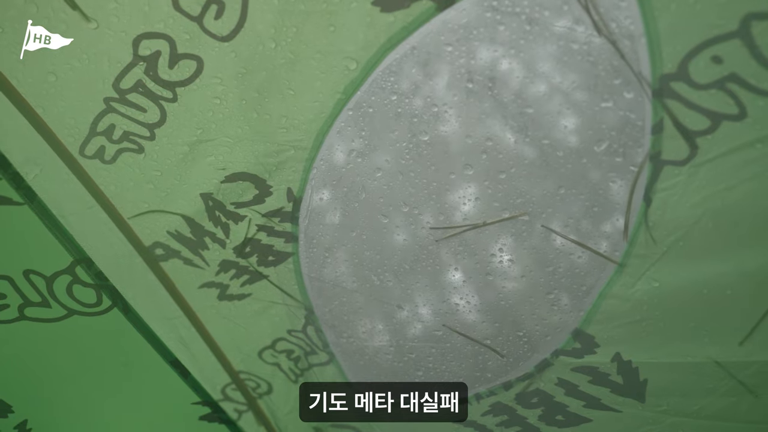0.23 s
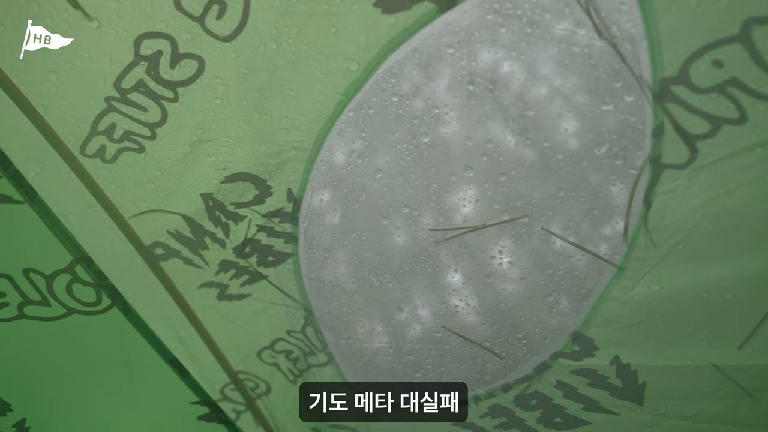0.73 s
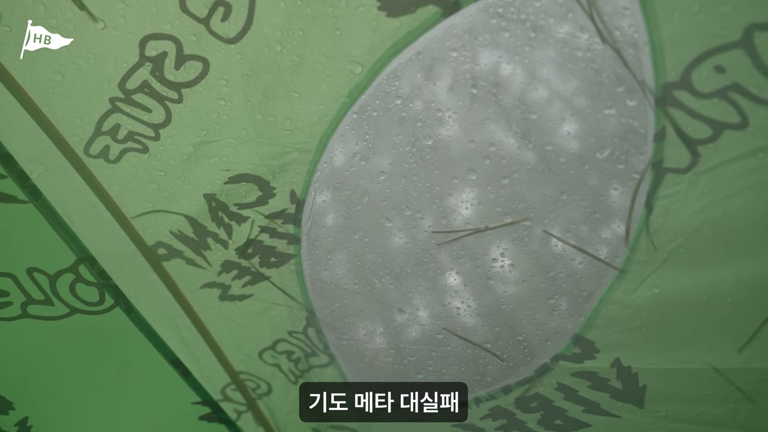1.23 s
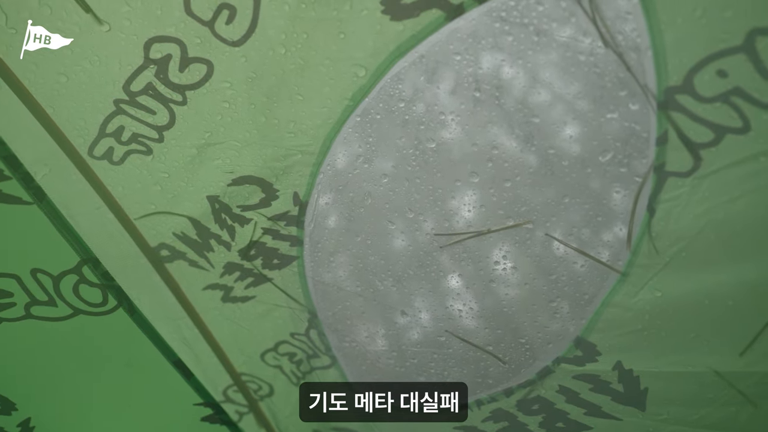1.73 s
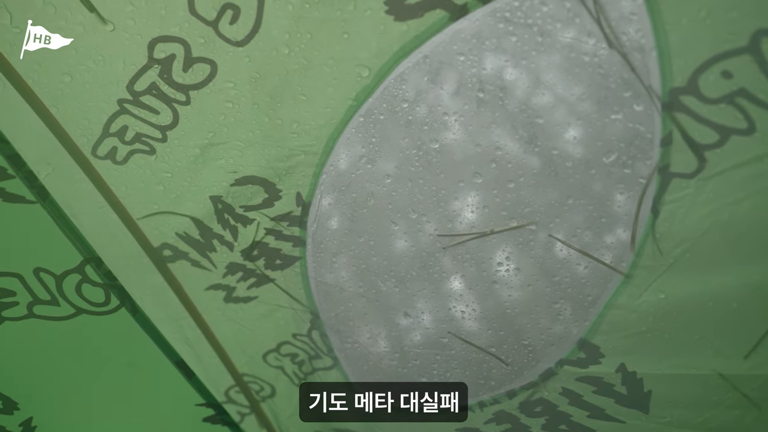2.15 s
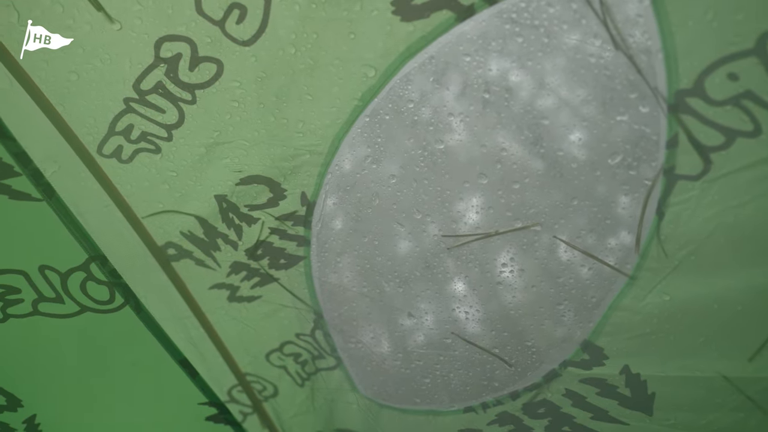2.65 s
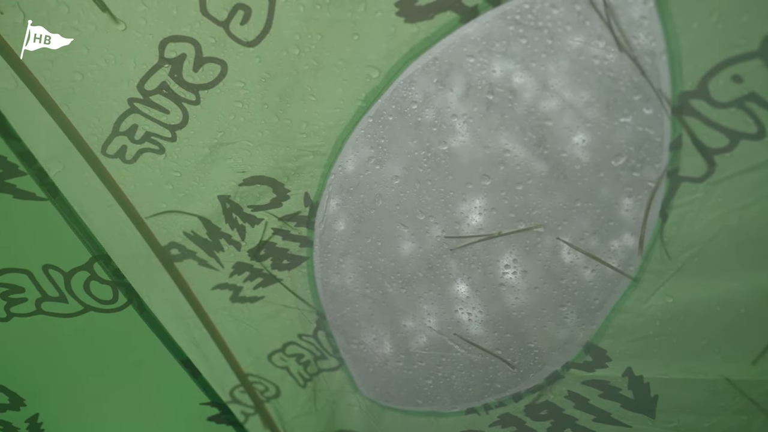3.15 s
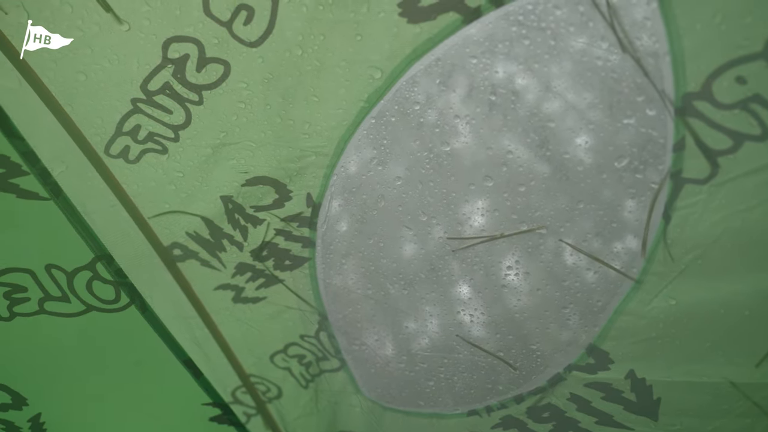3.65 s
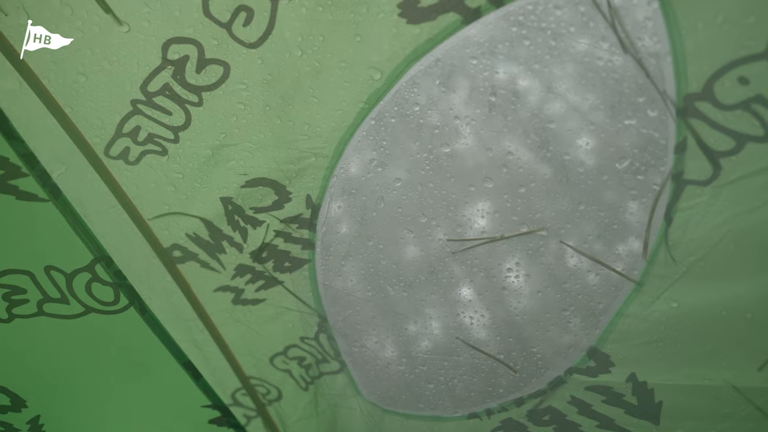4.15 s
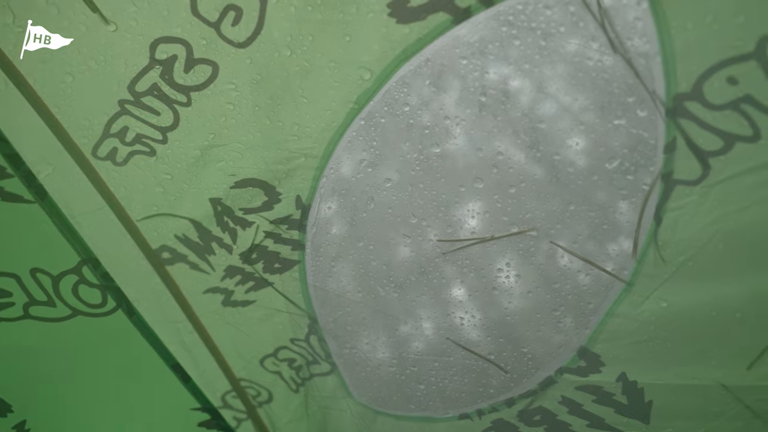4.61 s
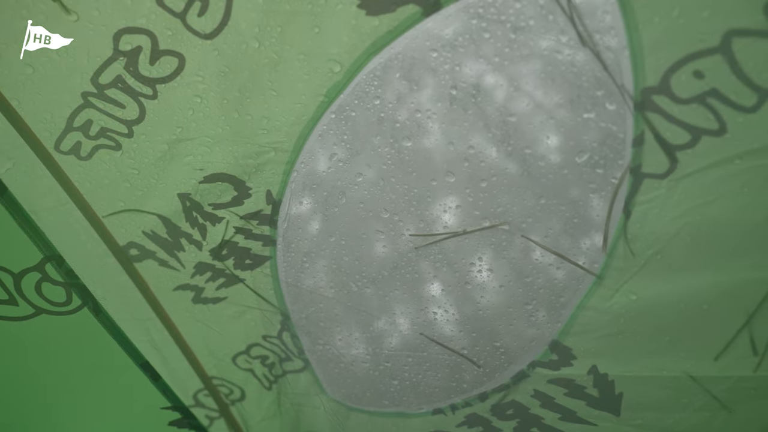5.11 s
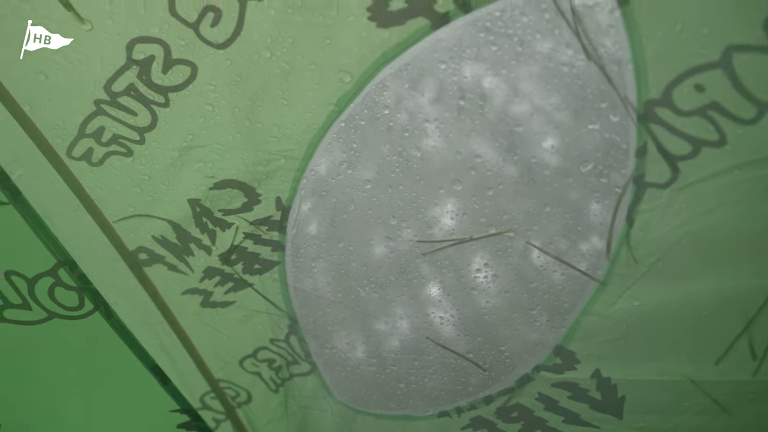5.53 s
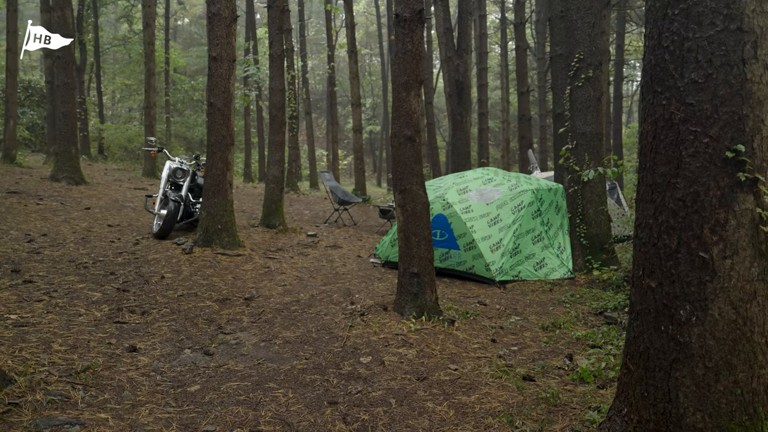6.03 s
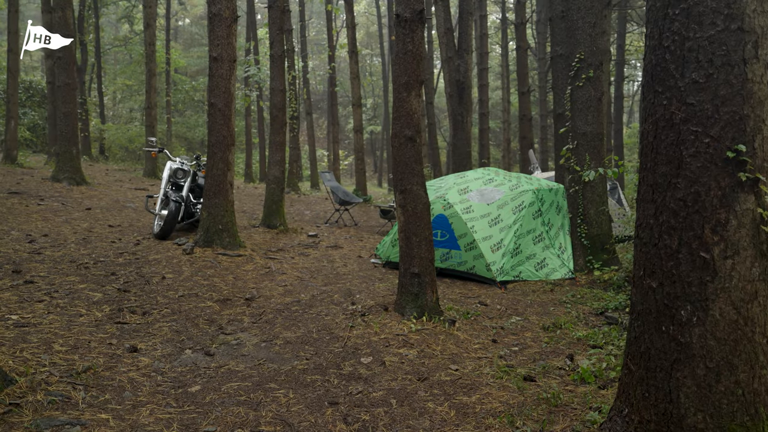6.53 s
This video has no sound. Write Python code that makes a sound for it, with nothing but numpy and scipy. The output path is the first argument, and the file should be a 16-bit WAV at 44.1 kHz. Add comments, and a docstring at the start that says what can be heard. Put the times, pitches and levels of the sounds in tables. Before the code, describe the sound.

Under tent fabric, uneven drops tap and pop over fine rain patter and faint birdsong, before a sudden cut to hushed forest drizzle.

```python
"""Fine rain hisses and patters; at once drops from trees thud, tick and splash on a taut tent, heard from inside.
Each drop sets off cloth modes, a panel sway and noise bursts; filtered noise hisses and resonators patter.
Far off two small birds whistle as gliding sines, scattered among the trunks, over a faint noise-band twitter.
Near the end the listener stands outside: the birds cease, the hiss takes another colour,
and the patter goes on with a few soft drips and bright leaf ticks."""
import sys
import numpy as np
from scipy import signal
from scipy.fft import rfft, irfft
from scipy.io import wavfile

SR = 44100
rng = np.random.default_rng(int(sys.argv[2]) if len(sys.argv) > 2 else 0)


def persist_wave(psi):
    """Save psi, clipped to +-1, as 16-bit WAV."""
    counts = np.round(np.clip(psi, -1, 1) * 32767).astype(np.int16)
    wavfile.write(sys.argv[1], SR, np.atleast_2d(counts).T)


N = 298557
STEP_OUT_S = 5.77   # inside the tent before, among the trees after


def from_db(db):
    """Logarithmic level: the amplitude gain of a level in dB."""
    return 10 ** (np.asarray(db) / 20)


def rms_one(x):
    """Power normalisation: scale to rms 1."""
    return x / np.sqrt(np.mean(x ** 2) + 1e-20)


def peak_one(rows):
    """Peak normalisation: scale each row to peak 1."""
    return rows / np.abs(rows).max(axis=1, keepdims=True)


def dying(t, t60):
    """Exponential damping: an envelope that loses 60 dB in t60 seconds."""
    return from_db(-60 * t / t60)


def coloured(x, spectrum):
    """Spectral shaping: weight noise by a (Hz, dB) table along the last axis; rms 1."""
    size = x.shape[-1]
    hz, level_db = np.transpose(spectrum)
    bins = np.maximum(np.arange(size // 2 + 1) * SR / size, 1)
    gain = from_db(np.interp(np.log(bins), np.log(hz), level_db))
    return rms_one(irfft(rfft(x) * gain, size))


def band(x, low_hz, high_hz):
    """Band limiting: causal band-pass along the last axis."""
    return signal.sosfilt(signal.butter(2, [low_hz, high_hz], "band", fs=SR, output="sos"), x)


def low_pass(x, hz):
    """High-frequency loss: causal second-order low-pass along the last axis."""
    return signal.sosfilt(signal.butter(2, hz, fs=SR, output="sos"), x)


def slow(shape, rate_hz):
    """Random modulation: noise that wanders at about the given rate along the last axis; rms 1."""
    return rms_one(low_pass(rng.standard_normal(shape), rate_hz))


def convolved_rows(a, b):
    """Linear response: circular convolution of rows, which die out within their length."""
    return irfft(rfft(a) * rfft(b), a.shape[-1])


# Colour of the far rain under the cloth and in the open, before scaling to rms 1: f/Hz, level/dB [dB per Hz]
HISS_INSIDE = [(15, -46), (25, 0.5), (273, 3.5), (433, 4), (809, 0), (927, 0.5), (1320, -0.5), (1550, -3),
               (2750, -3.5), (3700, -1), (5130, -13), (14400, -26), (16500, -40)]
HISS_OUTSIDE = [(12, -29), (20, 2), (49, -5), (117, 5), (224, 0), (492, -3), (634, -3.5), (888, -1),
                (2310, -8.5), (3620, -2.5), (5520, -16), (15200, -30.5), (16500, -46)]
HISS_DB = -58


def hiss():
    """Superposition of countless impacts: far rain as smooth noise, whose colour depends on the place."""
    inside = coloured(rng.standard_normal(N), HISS_INSIDE)
    outside = coloured(rng.standard_normal(N), HISS_OUTSIDE)
    return from_db(HISS_DB) * np.where(np.arange(N) / SR < STEP_OUT_S, inside, outside)


# The patter swells and eases: t/s, level/dB [rms]
RAIN = [(0.0, -64), (0.41, -58.5), (1.71, -64), (2.3, -62), (2.6, -58.5), (3.18, -64), (3.75, -59.5),
        (4.26, -63), (4.7, -58), (5.19, -55), (5.88, -65), (6.77, -61)]
PATTER_PER_S, PATTER_SPREAD_DB = 300, 2.5


def patter():
    """Random impulses exciting damped resonators: each small drop rings one or two pitches for a few cycles."""
    extra_db = PATTER_SPREAD_DB * np.minimum(rng.exponential(1, N), 3)
    sizes = from_db(extra_db) * (rng.random(N) < PATTER_PER_S / SR)
    pitches = np.geomspace(600, 9000, 10)
    dealt = rng.integers(0, 10, (2, N))
    ringing = np.zeros(N)
    for k, hz in enumerate(pitches):
        radius = from_db(-60 * hz / (6.0 * SR))   # loses 60 dB in six cycles
        angle = 2 * np.pi * hz / SR
        strike = from_db(-5.0 * abs(np.log2(hz / 3000))) * sizes * (dealt == k).any(axis=0)
        resonator = [0, np.sin(angle)], [1, -2 * radius * np.cos(angle), radius ** 2]
        ringing += signal.lfilter(*resonator, strike + 1e-18)
    t = np.arange(SR // 40) / SR
    smear = (t == 0) + 0.39 * rng.standard_normal(len(t)) * dying(t, 0.027)   # each leaves a little splash
    soft = low_pass(signal.fftconvolve(ringing, smear)[:N], 5500)
    s, level_db = np.transpose(RAIN)
    return from_db(np.interp(np.arange(N) / SR, s, level_db)) * rms_one(soft)


def far_twitter():
    """Amplitude-modulated narrow-band noise: a faint twitter that comes and goes until the listener is outside."""
    twitter = rms_one(band(rng.standard_normal(N), 7400, 7630))
    level_db = -80.5 + 3.3 * slow(N, 6.1)
    return twitter * from_db(level_db) * (np.arange(N) / SR < STEP_OUT_S)


THUD_CYCLES = 6.16   # cycles to lose 60 dB
OVERTONE_T60_S, TICK_T60_S = 0.004, 0.0027
TICK_HZ, TICK_SPREAD = 3515, 0.084       # central pitch, greatest share by which the spot shifts it
BREAK_UP_DB, BREAK_UP_T60_S = -8, 0.0085
CONTACT_HZ = 5950   # water is soft: it cannot excite the cloth much above this


def cloth_modes(t, spot, thud_hz, over_hz, over_db, tick_db):
    """Modal excitation of a membrane: a damped low mode, with a high mode and tick driven by a ragged push."""
    # the drop shatters: a ragged push after the first
    push = (t == 0) + from_db(BREAK_UP_DB) * rng.standard_normal((len(spot), len(t))) * dying(t, BREAK_UP_T60_S)
    thud = np.sin(2 * np.pi * thud_hz * t) * dying(t, THUD_CYCLES / thud_hz)
    overtone = np.sin(2 * np.pi * over_hz * t) * dying(t, OVERTONE_T60_S)
    tick_hz = TICK_HZ * (1 + TICK_SPREAD * np.tanh(spot))
    tick = np.sin(2 * np.pi * tick_hz * t) * dying(t, TICK_T60_S)
    overtone, tick = convolved_rows(overtone, push), convolved_rows(tick, push)
    thud, overtone, tick = [peak_one(low_pass(mode, CONTACT_HZ)) for mode in (thud, overtone, tick)]
    return thud + from_db(over_db) * overtone + from_db(tick_db) * tick


def crack(t, noise):
    """Transient broadband radiation: a very short band of noise at impact; peak 1."""
    return peak_one(band(noise * dying(t, 0.0019), 2900, 9100))


# Drops on a slack panel, which sways more: t/s, extra sway level/dB
SLACK_HITS = [(.3348, 10), (.5818, 15.5), (1.9484, 11), (2.4411, 8), (2.4843, 4), (2.7523, 6.5),
              (3.3563, 15), (3.3904, 18), (3.7375, 7), (4.7214, 12), (4.9, 9), (5.1511, 12.5),
              (5.3842, 12.5), (5.5412, 12), (5.5981, 15), (5.675, 10)]
# against the thud of a middling drop: more sway under a deep thud, less in step with a strong one
MIDDLING_DB, MIDDLING_HZ = -35, 800
SWAY_DB, SWAY_DB_PER_OCTAVE, SWAY_SHRINKS = -29.5, -2, 0.32
# glide at a central spot; SPOT_SHIFT is the spread of pitch from spot to spot, as a share
SWAY_START_HZ, SWAY_END_HZ, SWAY_GLIDE_S, SPOT_SHIFT = 272, 82, 0.0173, 0.22
SWAY_T60_S = 0.25


def panel_sway(t, spot, s, thud_db, thud_hz):
    """Tension-dependent resonance: the stretched panel slackens, so its low tone falls, with low noise."""
    level_db = SWAY_DB + SWAY_DB_PER_OCTAVE * np.log2(thud_hz / MIDDLING_HZ)
    level_db = level_db - SWAY_SHRINKS * (thud_db - MIDDLING_DB)
    level_db = level_db + sum(extra_db * (abs(s - at) < .005) for at, extra_db in SLACK_HITS)
    hz = SWAY_END_HZ + (SWAY_START_HZ - SWAY_END_HZ) * np.exp(-t / SWAY_GLIDE_S)
    tone = np.sin(2 * np.pi * np.cumsum(hz) / SR * (1 + SPOT_SHIFT * spot))
    rumble = peak_one(band(rng.standard_normal(tone.shape), 50, 196))
    sway = (tone + 1.9 * rumble) * (1 - dying(t, 0.035)) * dying(t, SWAY_T60_S)
    return from_db(level_db) * peak_one(sway)


def droplets(t, rows):
    """Random granularity: the sheet takes a moment to tear up, and falls in separate droplets."""
    return from_db(3.33 * slow((rows, len(t)), 267)) * (1 - dying(t, 0.0029))


# Colour of the splash, before scaling to rms 1: f/Hz, level/dB [dB per Hz]
SPLASH = [(150, -20), (500, 3.5), (1500, -3.5), (2600, -2.5), (3700, 0.5), (5200, -8.5), (7000, -42)]
SPLASH_S, SPLASH_SHAPE = 0.011, 1.19   # it holds, then drops away
OWN_COLOUR = 0.63   # share of its power that rings the struck spot


def splash(t, cloth, noise):
    """Random re-excitation: falling droplets ring the same modes as the drop, mixed with plain splash noise."""
    rung = convolved_rows(cloth, rng.standard_normal(cloth.shape))
    rung = rung / rung.std(axis=1, keepdims=True)
    mixed = np.sqrt(OWN_COLOUR) * rung + np.sqrt(1 - OWN_COLOUR) * coloured(noise, SPLASH)
    return mixed * droplets(t, len(cloth)) * np.exp(-(t / SPLASH_S) ** SPLASH_SHAPE)


# Colour of the spray, before scaling to rms 1: f/Hz, level/dB [dB per Hz]
SPRAY = [(3500, -26), (5500, 1.5), (8000, -4), (11000, -13), (15500, -17)]
SPRAY_BELOW_SPLASH_DB, SPRAY_FOLLOWS_CRACK, SPRAY_T60_S = -11.5, 0.24, 0.084


def spray(t, crack_db, splash_db):
    """Decaying granular noise: bright spray, longer than the splash and stronger after a strong crack."""
    level_db = splash_db + SPRAY_BELOW_SPLASH_DB + SPRAY_FOLLOWS_CRACK * crack_db
    noise = coloured(rng.standard_normal((len(crack_db), len(t))), SPRAY)
    return from_db(level_db) * noise * droplets(t, len(crack_db)) * dying(t, SPRAY_T60_S)


def taps(table):
    """Impact superposition: each row's drop rings the cloth, cracks, sways the panel, splashes and sprays."""
    s, thud_db, thud_hz, over_hz, over_db, tick_db, crack_db, splash_db = np.transpose(table)[:, :, None]
    t = np.arange(3600) / SR
    spot = rng.standard_normal((len(s), 1))   # where the drop lands shifts tick and sway
    noise = rng.standard_normal((len(s), len(t)))   # crack and splash come from the same water
    cloth = cloth_modes(t, spot, thud_hz, over_hz, over_db, tick_db)
    sounds = cloth + from_db(crack_db) * crack(t, noise)
    sounds = sounds + panel_sway(t, spot, s, thud_db, thud_hz)
    sounds = sounds + from_db(splash_db) * splash(t, cloth, noise) + spray(t, crack_db, splash_db)
    sounds = from_db(thud_db) * sounds
    out = np.zeros(N + len(t))
    for start, sound in zip((s[:, 0] * SR).astype(int), sounds):
        out[start:start + len(t)] += sound
    return out[:N]


# Mean and spread of the small drops' levels, rows thud, overtone, tick, crack, splash (the last four
# against the thud): mean level/dB, spread of level/dB; the patter's swing is added to the thud
SMALL_DB = [(-50.5, 4.34), (3.5, 3.7), (0.5, 8.8), (-13, 11), (-10, 5.5)]
SMALL_DROPS = 70
SMALL_THUD_HZ, SMALL_OVERTONE_HZ = (360, 1300), (1400, 2900)   # ranges
SMALL_FOLLOW = 0.34   # share of the patter's swing


def small_drops():
    """Random arrivals: small drops at chance moments under the cloth, louder when the patter swells."""
    when, low, high = rng.random((SMALL_DROPS, 3)).T
    mean, spread = np.transpose(SMALL_DB)
    luck = np.clip(rng.standard_normal((SMALL_DROPS, 5)), -2, 2)
    thud_db, *parts_db = (mean + spread * luck).T
    s = when * STEP_OUT_S
    rain_s, patter_db = np.transpose(RAIN)
    thud_db = thud_db + SMALL_FOLLOW * (np.interp(s, rain_s, patter_db) - patter_db.mean())
    thud_hz = SMALL_THUD_HZ[0] * (SMALL_THUD_HZ[1] / SMALL_THUD_HZ[0]) ** low
    over_hz = SMALL_OVERTONE_HZ[0] * (SMALL_OVERTONE_HZ[1] / SMALL_OVERTONE_HZ[0]) ** high
    return taps(np.transpose([s, thud_db, thud_hz, over_hz, *parts_db]))


# The drops one can point at, on the cloth and later among the trees: t/s, thud peak level/dB, thud f/Hz,
# overtone f/Hz, then level/dB against the thud of overtone, tick, crack, splash
DROPS = [(0.0357, -46.5, 1300, 1620, 13.5, -10, -15, -11), (0.045, -47, 940, 2000, 8, 8.5, 2, -1),
         (0.0592, -51.5, 654, 1490, -3, 4, -6, 3), (0.0965, -25, 1340, 1420, 0.5, -25, -29, -10),
         (0.128, -38.5, 930, 1400, -8, -18, -22, -27), (0.1757, -47, 930, 2900, -11, 17, -31, 7),
         (0.1942, -32.5, 1290, 1440, 8.5, 1, -14, -21), (0.2787, -6.5, 770, 1160, 3, -6.5, -21, -31),
         (0.3356, -35.5, 730, 1420, -14, -22, -28, -6.5), (0.394, -50, 700, 2830, 2, 10, 0, -10),
         (0.404, -33.5, 403, 1700, -15, 13.5, -6, -9), (0.4186, -34, 610, 2660, 1, 6, -10, -7.5),
         (0.4316, -31, 394, 1940, -1, -6, -15, -13.5), (0.4757, -43, 1300, 1650, 17, 7, -24, -1),
         (0.4962, -35.5, 970, 1750, -1, 4, -23, -13), (.539, -30, 1060, 1520, -1, -6, -13, -21),
         (0.5568, -46, 1140, 2820, 7, -6, -9, 0), (0.5819, -9, 623, 1440, 3.5, -5.5, -21, -21),
         (0.6304, -35, 555, 1550, 4.5, -13, -16, -12.5), (0.7494, -28, 815, 1340, -2, -4, -17, -27),
         (0.7633, -41, 1290, 1520, 11.5, -17, -12, -4.5), (0.8021, -38.5, 736, 1540, 4, -5, -20, 0),
         (0.8756, -32, 1300, 2570, -4, -18, -19, -10.5), (0.9148, -33.5, 540, 1800, 2.5, -2, -9, -1),
         (0.9618, -38, 497, 1640, 3, -1, -22, -13), (0.985, -25.5, 536, 1520, -0.5, 2.5, -11, -10.5),
         (1.117, -47.5, 1135, 2380, 4, -8, -7, -1), (1.1644, -44.5, 476, 1450, 8, 0, -9, -4.5),
         (1.2286, -24, 1210, 2300, -7, 5.5, -18, -16), (1.2741, -37, 840, 1400, 3, 5, 2, -9.5),
         (1.3057, -23, 1220, 1300, -0.5, -4, -14, -13.5), (1.3138, -22, 670, 1330, 0.5, -4, -7, -15),
         (1.5249, -23.5, 890, 1720, -14, -10, -21, -23.5), (1.6786, -25, 830, 1290, 1, 2, -28, -20),
         (1.6855, -39, 1070, 2830, -15, 9.5, -6, -3), (1.7637, -35.5, 368, 2030, -2, 0.5, -17, -11.5),
         (1.8184, -28.5, 1250, 1440, -1, -20, -21, -18.5), (1.9158, -47.5, 1300, 1430, -2, 0, -12, 1),
         (1.9488, -29, 640, 2650, -8, -2, -19, -8.5), (2.0925, -41.5, 1080, 1410, -5, -4, -25, -20),
         (2.2077, -47, 380, 3200, 10.5, 19, 18.5, 6.5), (2.2253, -39.5, 1290, 1410, -12, -12, -9, -3),
         (2.2473, -41.5, 1290, 1410, -8, 1, -3, -3.5), (2.2648, -45, 450, 1460, -7, 4, 8, -13),
         (2.2787, -21.5, 1090, 2730, 2.5, -25, -27, -17), (2.3012, -41.5, 553, 2000, 6, 13.5, -17, 1),
         (2.332, -36.5, 794, 1440, 1, -17, -8, -4), (2.3391, -38.5, 880, 1410, -11, 8, -7, -5),
         (2.354, -39.5, 1120, 2120, -7, 9, 9, -5), (2.3689, -31.5, 606, 1460, 4, -10, -12, -15),
         (2.3874, -15, 750, 2400, -4, -30, -14, -27), (2.4413, -39.5, 580, 1740, 7, 7, -5, 0),
         (2.4843, -4, 590, 1410, -7, -2.5, -18, -25.5), (2.575, -39.5, 574, 1860, -5, -2, -23, -11),
         (2.733, -42, 1070, 2900, 2, 5, -2, -11), (2.7522, -9, 770, 2480, -1.5, -9.5, -42, -24),
         (2.847, -50, 750, 1780, 7, 11, 3, -9), (2.9024, -32.5, 745, 1640, -3, 1.5, -17, -17),
         (2.94, -45, 1280, 1450, 3, 5.5, -1, -2.5), (2.9685, -33.5, 1270, 1390, -4, -17, -9, -21),
         (3.0534, -48, 1070, 2470, 2, 3, 7, -18), (3.0655, -37, 900, 1370, -1, -8, -3, -14.5),
         (3.1098, -37, 600, 2730, 3.5, -12, -13, -19), (3.2315, -37, 850, 1920, -4, -2, -20, -4),
         (3.2542, -22.5, 1340, 1560, 2, -7, -10, -14), (3.3561, -33, 940, 1540, -0.5, -20, -24, -8),
         (3.3903, -38, 362, 2480, 4, -7, -13, -4), (3.4771, -30, 890, 2860, 1, -3, -13, -14),
         (3.4903, -38.5, 356, 1560, -9, 16.5, 7, -3), (3.5271, -35, 493, 1320, 9, -15, -6.5, -0.5),
         (3.5669, -41, 358, 1390, 4.5, 6, -18, 0), (3.5838, -22, 595, 1550, -1, -12, -21, -12.5),
         (3.6054, -18.5, 930, 1910, -2, -0.5, -8, -15), (3.682, -42, 1290, 1750, 6, 8.5, -2, -4),
         (3.7175, -36, 650, 2450, 11.5, -7, -19, -9), (3.7216, -25.5, 1070, 1600, -21, -8, -22, -14),
         (3.7372, -13, 735, 1570, -4, -35, -14.5, -13.5), (3.815, -51, 360, 2700, 9, 9, -1, 10.5),
         (3.8336, -42, 640, 2000, -6, 10.5, -10, -9), (3.8742, -30, 1300, 1470, -1, -4, -20, -1),
         (3.9014, -17.5, 734, 1850, 1, -3.5, -27, -19), (3.9429, -33, 1290, 1420, 2, 11.5, -5, -7),
         (3.9775, -42.5, 390, 1410, 3, 10, -8, -4), (4.0158, -23, 425, 1290, 5.5, -7, -31, -7.5),
         (4.022, -20.5, 750, 1950, -1.5, 5.5, -12, -18), (4.0595, -50, 580, 2660, 1, 9, 1, -4),
         (4.1369, -21, 910, 1570, -38, -5.5, -44, -16.5), (4.1812, -28, 940, 1840, -5, -3, -41, -20),
         (4.2366, -34, 1030, 1410, -6, -19, -11, -28), (4.2723, -38, 510, 2100, 9, 1, -9, -16),
         (4.282, -32.5, 476, 1400, 6, -1, -7, -3), (4.3237, -25, 1260, 1430, -1, 4.5, -10, -5.5),
         (4.3699, -42.5, 930, 1920, -1, 11, 0, 0.5), (4.3892, -45.5, 740, 1540, -5, 7, -9, 2),
         (4.4537, -29, 1000, 1780, -13, -8, -12, -8), (4.5005, -34, 800, 1900, -2, 1, -6.5, -17),
         (4.5051, -19, 470, 1340, 8.5, -1.5, -0.5, -12.5), (4.5372, -41, 640, 1700, 0, 6, -18, -1),
         (4.556, -42, 1140, 1630, 10, 14, -22, 1.5), (4.5858, -41.5, 1290, 1430, -9, 5, -5, -6),
         (4.5996, -2, 753, 2110, -4, -1, -7.5, -27.5), (4.6687, -32.5, 804, 1960, 1.5, -4, -19, -30),
         (4.7002, -28.5, 935, 1390, -5.5, -6, -5, -21), (4.7217, -29, 1030, 2160, 4.5, 1.5, -8, -10.5),
         (4.7549, -28.5, 513, 1870, -2, -5, -23, -10), (4.8191, -22.5, 880, 1620, 8, -1.5, -45, -18),
         (4.861, -25, 970, 1940, -8.5, -3.5, -42, -7.5), (4.8817, -29, 567, 1410, -2, -6, -12, -18),
         (4.9, -35, 1100, 2690, -1.5, 7.5, -11, -12), (4.9824, -9, 765, 1980, 0.5, -3, -33, -27),
         (4.9924, -33.5, 970, 1730, -11, 16.5, 9, 0), (5.02, -30.5, 1250, 1940, 0, -2, -14, -8),
         (5.0606, -11.5, 706, 1710, -4, -3, -21, -26), (5.0846, -20, 685, 1530, 0.5, -3, -13, -10),
         (5.1452, -41.5, 900, 2000, 5, 2.5, -2, -6), (5.1512, -16.5, 544, 2080, -3.5, -4, -21, -20),
         (5.1643, -39, 530, 1410, -3, 13, -15, -4), (5.2048, -34, 1110, 2180, 0, -10, -20, -6.5),
         (5.2136, -28, 760, 2000, -1, -11, -9, -6.5), (5.249, -34, 850, 1410, -6, -16, -7, -16),
         (5.2888, -22.5, 1100, 2090, -4, 4, -14, -22), (5.3303, -42, 880, 2900, -8, 11, 0, -10),
         (5.3514, -28.5, 1220, 2920, -10, -5, -13, -20), (5.3842, -33.5, 900, 2930, 5.5, -3, -14, -4.5),
         (5.4254, -19, 854, 1370, -5.5, -12, -21, -17), (5.4908, -28.5, 885, 1880, -9, -3, -6, -21),
         (5.5413, -26, 596, 1980, -8, 4.5, -18, -14), (5.5522, -39.5, 1110, 2250, -2, 2, -2, -2.5),
         (5.5981, -30, 1300, 1610, 5, 5.5, -17, -5), (5.61, -37.5, 680, 1900, 4, -11, -2, -6.5),
         (5.675, -46.5, 358, 2580, 2, -4, -4, 1.5), (5.752, -44.5, 1300, 2380, -3, 25, 7, -4),
         (6.2532, -39.5, 755, 1410, -4, 1, -11, -15), (6.3884, -25, 800, 1420, -27, -35, -33, -26),
         (6.5262, -46, 400, 2900, -13, 4, -1, -20), (6.7416, -37, 1000, 2730, -14, -10, -16, -14.5)]


def distinct_drops():
    """Discrete impacts: the single drops that stand out from the rain."""
    return taps(DROPS)


HEAVY_DB = -22   # thuds above this are followed by a rebound
REBOUND_S, REBOUND_DB = .011, -26.5   # mean delay, mean level against the first thud
REBOUND_TICK_DB, REBOUND_CRACK_DB, REBOUND_SPLASH_DB = 4, -7, -8   # against the rebound's own thud


def rebounds():
    """Secondary impact: a heavy drop throws up a bead that lands again, fainter, near the same spot."""
    rows = []
    for s, thud_db, thud_hz, over_hz, over_db, *_ in DROPS:
        if thud_db > HEAVY_DB:
            a, b, c = rng.standard_normal(3)
            rows.append((s + REBOUND_S * (1 + .1 * a), thud_db + REBOUND_DB + 3.2 * b,
                         thud_hz * (1 + .15 * b), over_hz * (1 + 0.087 * c), over_db,
                         REBOUND_TICK_DB, REBOUND_CRACK_DB, REBOUND_SPLASH_DB))
    return taps(rows)


def glide(notes):
    """Frequency modulation: sines that follow (s, Hz, rms dB) rows, with soft ends."""
    t, song = np.arange(N) / SR, np.zeros(N)
    for note in notes:
        s, hz, level_db = np.transpose(note)
        ends = np.clip(np.minimum(t - s[0], s[-1] - t) / 0.0084, 0, 1)
        phase = 2 * np.pi * np.cumsum(np.interp(t, s, hz)) / SR
        song += np.sqrt(2) * ends * from_db(np.interp(t, s, level_db)) * np.sin(phase)
    return song


# A thin high bird's notes: start t/s, length t/s, level/dB [before the shape below]
SEEPS = [(.48, .135, -69), (.705, .152, -68), (.93, .148, -67), (1.175, .145, -67)]
# Shape of each note, rising with a flick at the end: share of note, f/Hz, level/dB [added]
SEEP_SHAPE = [(0, 7300, -1), (.5, 7780, -1), (.86, 8150, 0), (1, 8700, -3)]


def high_bird():
    """Pure-tone glide: clear high notes that share one rising contour."""
    return glide([[(start + share * length, hz, level_db + shape_db) for share, hz, shape_db in SEEP_SHAPE]
                  for start, length, level_db in SEEPS])


# A lower bird, one list per falling or level whistle: t/s, f/Hz, level/dB [before the blur]
WHISTLES = [
    [(.68, 5800, -75), (.72, 5200, -72), (.78, 4950, -74), (.88, 4600, -77)],
    [(1.19, 3700, -68), (1.23, 3650, -65)],
    [(1.335, 4860, -70), (1.375, 4810, -67), (1.41, 4790, -74), (1.45, 4800, -77)],
    [(1.345, 3820, -66), (1.385, 3680, -66)],
    [(1.50, 3700, -68), (1.64, 3500, -70)],
    [(1.97, 6250, -78), (2.03, 6150, -78), (2.08, 5250, -75), (2.13, 4720, -73), (2.2, 4580, -73)],
    [(5.12, 7000, -76), (5.2, 6800, -72), (5.38, 6700, -71), (5.52, 6680, -76)],
]
WHISTLE_BLUR_HZ = 60


def low_bird():
    """Amplitude fluctuation in propagation: falling and level whistles broken up by distance."""
    return glide(WHISTLES) * (.8 + .6 * slow(N, WHISTLE_BLUR_HZ))


FOREST_T60_S, FOREST_DB = 0.38, 3.5   # decay, level against the direct song


def birds():
    """Multiple scattering: both songs plus their diffuse tail among the trunks, until the listener is outside."""
    song = high_bird() + low_bird()
    t = np.arange(N) / SR
    tail = rng.standard_normal(SR // 2) * dying(t[:SR // 2], FOREST_T60_S)
    scattered = signal.fftconvolve(song, tail / np.sqrt(np.sum(tail ** 2)))[:N]
    return (song + from_db(FOREST_DB) * scattered) * (t < STEP_OUT_S)


def soft_bump():
    """Low-frequency chirp: one dull bump, a rising sine under a bell-shaped envelope."""
    t = np.arange(N) / SR - 5.729
    return from_db(-41.5) * np.sin(2 * np.pi * (60 + 1500 * t) * t) * np.exp(-((t - .012) / 0.0098) ** 2)


# Tiny bright ticks on leaves: t/s, impulse level/dB [before the band-pass]
LEAF_TICKS = [(5.8007, -44), (5.866, -37), (6.0675, -35), (6.3514, -34), (6.5345, -44)]


def leaf_ticks():
    """Impulse response: single clicks with only their treble left."""
    clicks = np.zeros(N)
    for s, click_db in LEAF_TICKS:
        clicks[int(s * SR)] = from_db(click_db)
    return band(clicks, 6500, 14000)


MIC_LOW_CUT_HZ = 161


def scene():
    """Superposition at one microphone, which hears little bass from the drops."""
    drops = distinct_drops() + rebounds() + small_drops()
    near = signal.sosfilt(signal.butter(2, MIC_LOW_CUT_HZ, "high", fs=SR, output="sos"), drops)
    rain = hiss() + patter()
    return (near + rain + far_twitter() + birds() + soft_bump() + leaf_ticks())[None]


CUTOFF_HZ = 16900   # 60 dB down from here up


def record(dry):
    """Saturation and band limiting: the loudest peaks are rounded, the top is cut."""
    rounded = 1.138 * np.tanh(dry / 1.318)
    return signal.sosfilt(signal.cheby2(12, 60, CUTOFF_HZ, fs=SR, output="sos"), rounded)


dry = scene()
out = record(dry)
persist_wave(out)
```